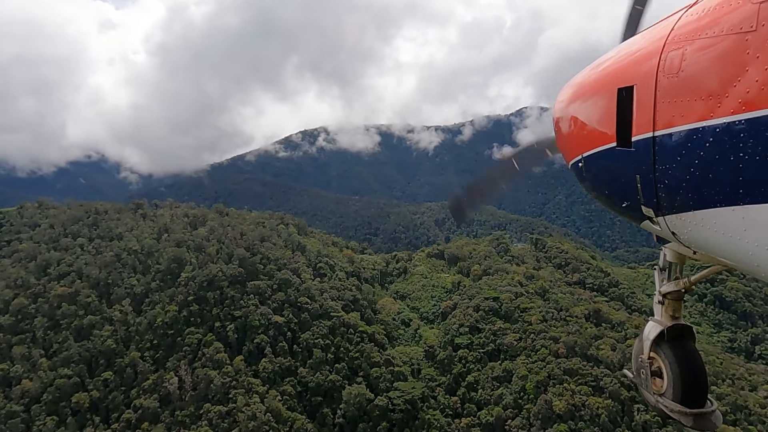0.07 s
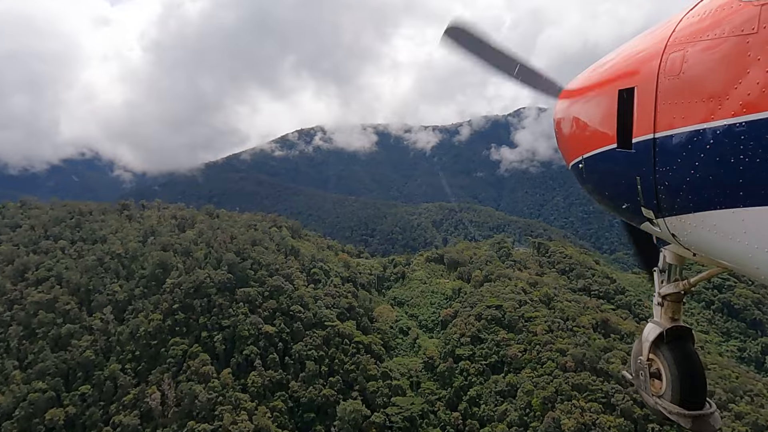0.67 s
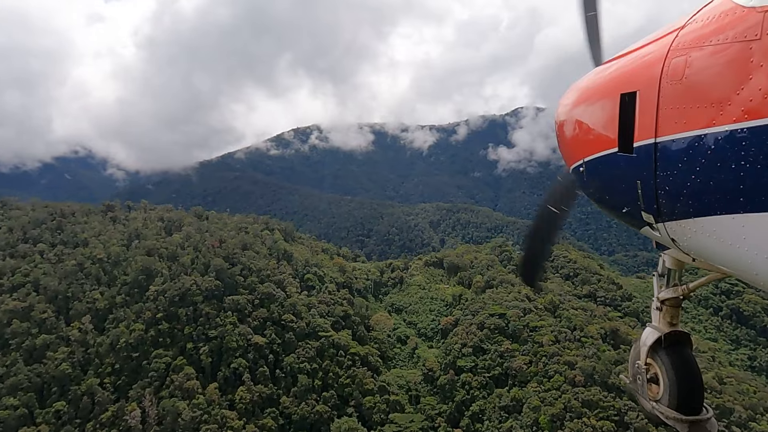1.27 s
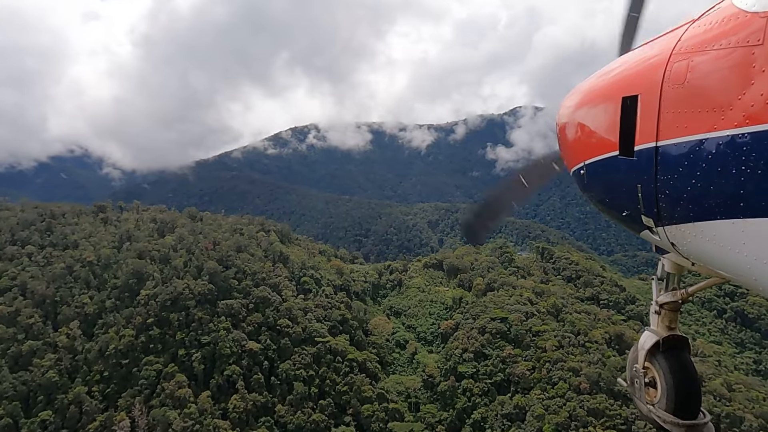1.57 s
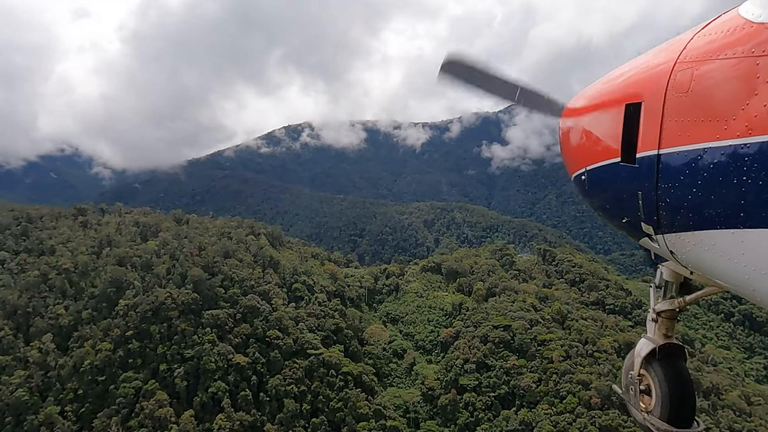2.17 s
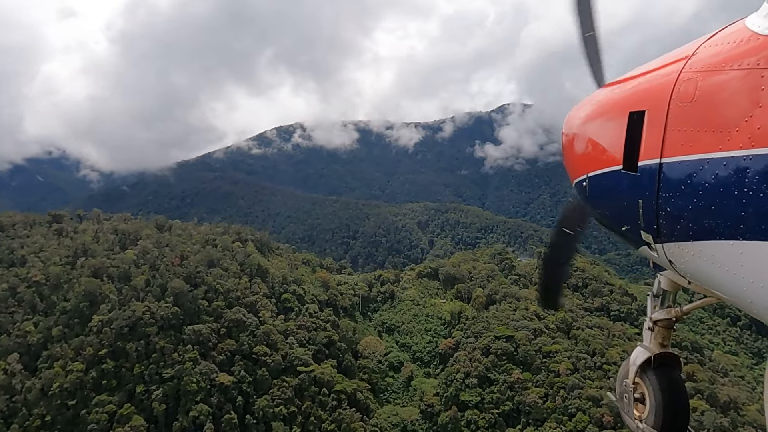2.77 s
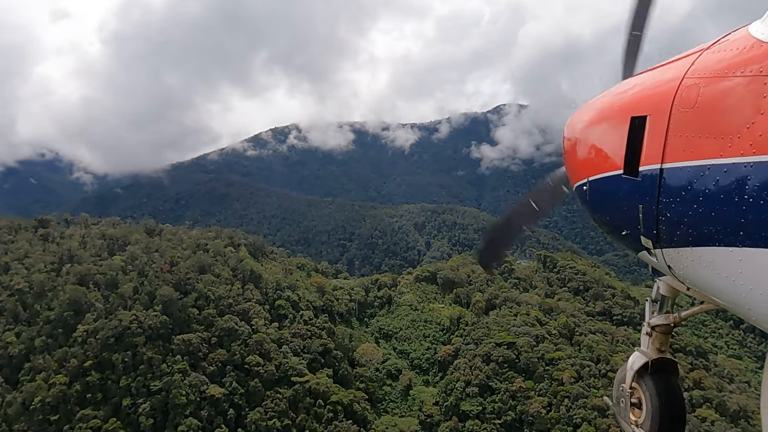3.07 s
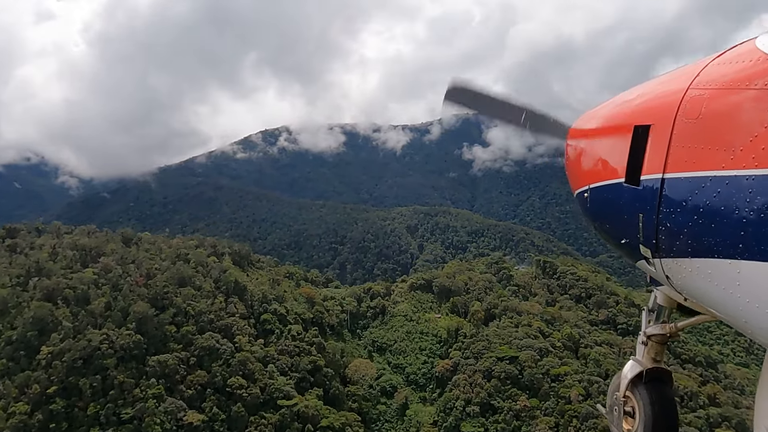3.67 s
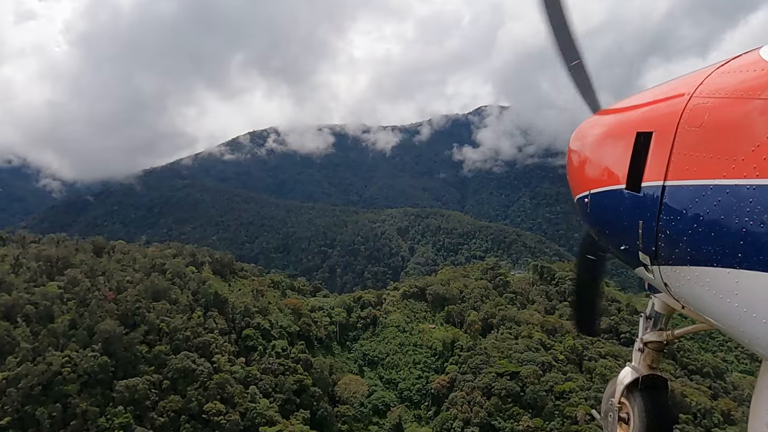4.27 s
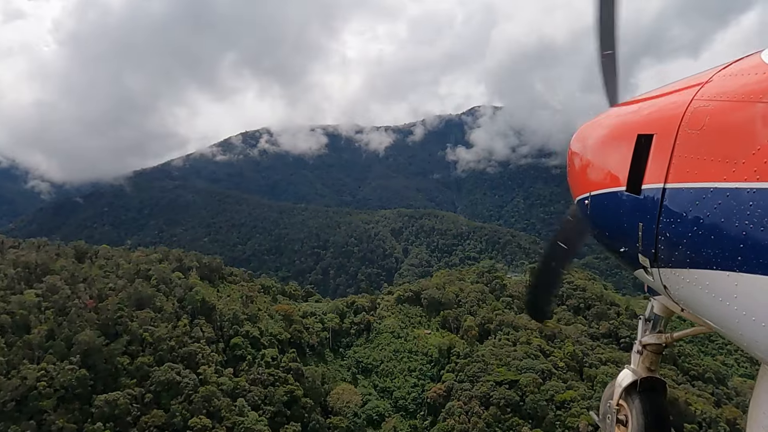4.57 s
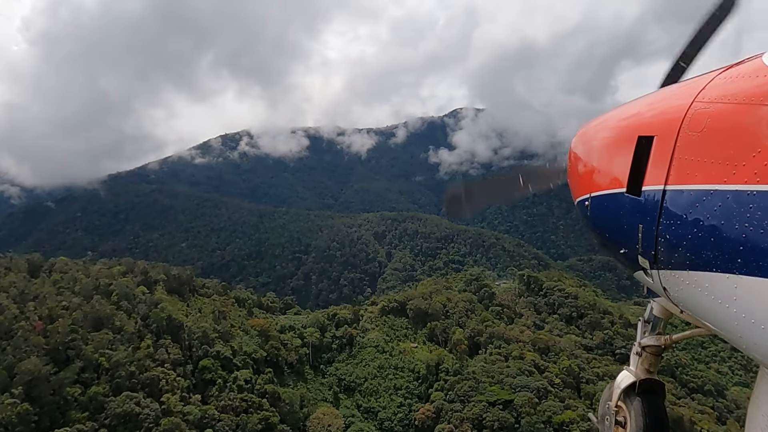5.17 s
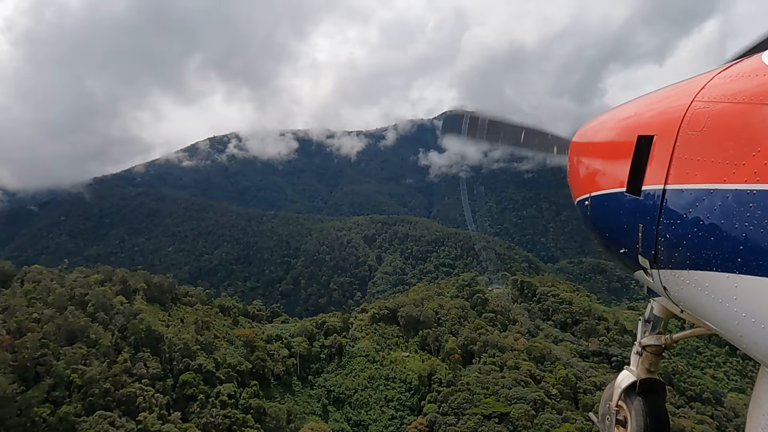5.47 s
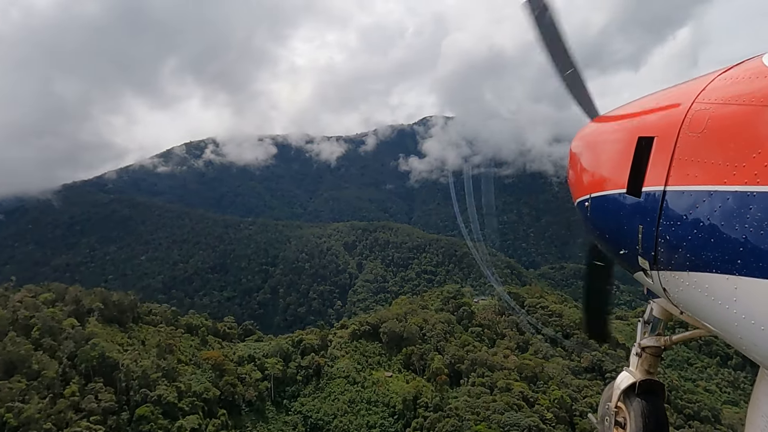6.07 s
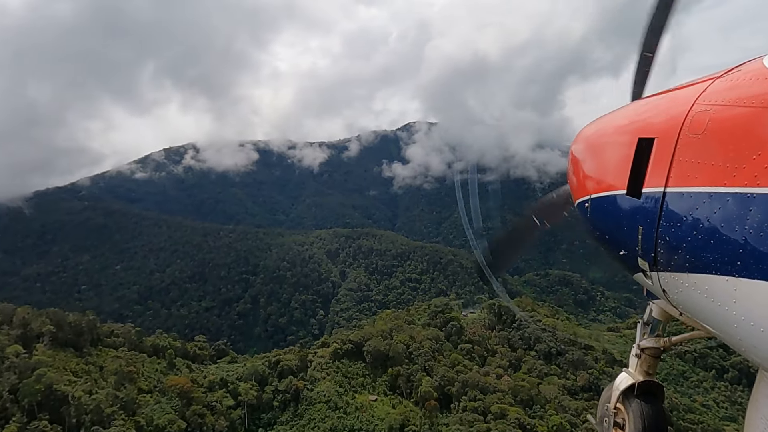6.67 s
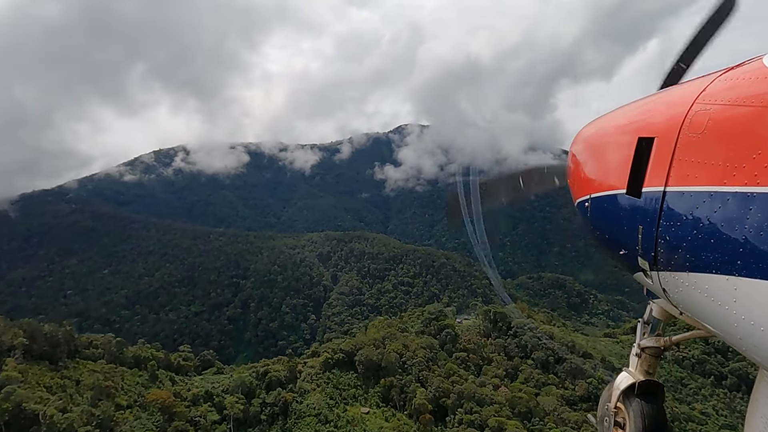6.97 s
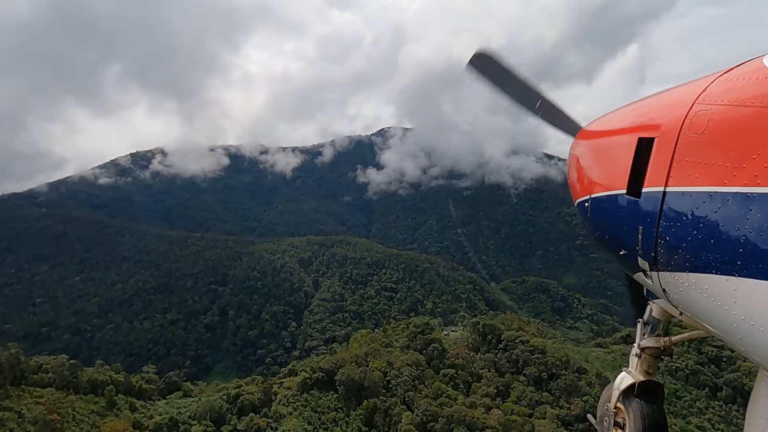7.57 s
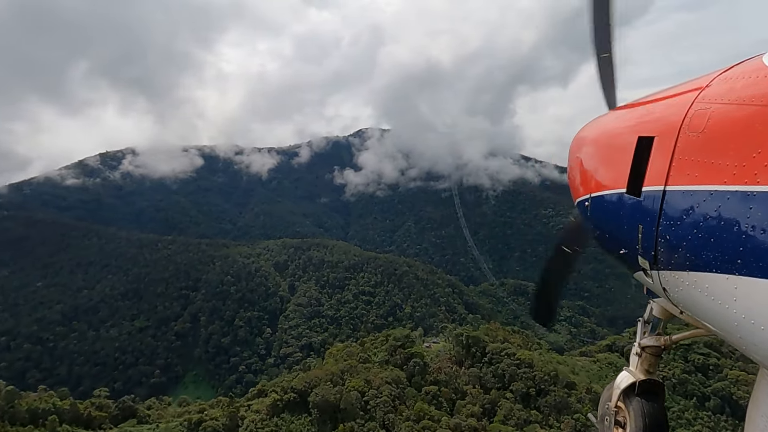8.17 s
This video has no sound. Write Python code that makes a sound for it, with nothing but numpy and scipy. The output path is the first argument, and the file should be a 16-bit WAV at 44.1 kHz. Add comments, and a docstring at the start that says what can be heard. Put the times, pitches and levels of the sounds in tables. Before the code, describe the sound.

Deep buffeting wind and a fluttering, slightly hollow rush of air surround a microphone mounted on a small plane in flight. Through it runs the low drone of the propeller, steady in pitch and wavering slightly in strength. A few light drizzle ticks land at scattered moments, and a thin turbine whine steps up in level midway while staying faint.

```python
"""A single-engine plane's three-blade propeller hums at governed speed, heard from a camera on the airframe.
Buffeting air roars heavily; the slipstream rings hollows of the airframe and hisses in quick eddies.
A faint turbine whine sits on top and steps up once. Drizzle ticks now and then on the camera,
whose limiter holds the level flat."""
import sys
import numpy as np
from scipy import signal
from scipy.fft import rfft, irfft, next_fast_len
from scipy.io import wavfile
from scipy.ndimage import uniform_filter1d, minimum_filter1d, map_coordinates

SR = 44100
rng = np.random.default_rng(int(sys.argv[2]) if len(sys.argv) > 2 else 0)


def waveform_to_disk(signal):
    """Save audio, clipped to [-1, 1], as 16-bit WAV at the path in sys.argv[1]."""
    frames = np.transpose(np.atleast_2d(signal))
    scaled = np.clip(frames, -1, 1) * 32767
    samples = np.round(scaled).astype(np.int16)
    wavfile.write(sys.argv[1], SR, samples)


N = 370881


def propeller(t, angle, throb_db, waver_db, smear_rad):
    """Each blade pushes a pressure pulse; turbulence makes the hum throb and shakes its overtones."""
    # harmonic, level_db
    tones = [(1, -20.9), (2, -26.3), (3, -37), (4, -31), (5, -41), (6, -40.5), (7, -38.5), (10, -39),
             (11, -43.5)]
    # harmonic, centre_s, gain_db, half_width_s
    swells = [(1, 1.8, -3.5, .2), (1, 4.5, 2.5, .25), (1, 6.05, -6, .55), (1, 7.6, 3.5, .4),
              (2, 1.5, 3.5, .25), (2, 4.3, -3, 1.6), (2, 6.45, -5, .35), (2, 7.25, 2.5, .3),
              (4, 4.3, -6, .2), (4, 6.9, -3.5, .3), (7, 3, 2.5, .9), (7, 6.5, -10, .8)]
    hum = np.zeros(N)
    for harmonic, level_db in tones:
        swell_db = bells(t, [row[1:] for row in swells if row[0] == harmonic])
        shake_db = throb_db * wobble(9) if harmonic == 1 else waver_db * wobble(3)
        phase = harmonic * angle + rng.uniform(0, 2 * np.pi) + smear_rad * wobble(6.6)
        hum += amp(level_db + swell_db + shake_db) * np.cos(phase)
    return np.sqrt(2) * hum


def blade_angle(blade_hz, drift_hz):
    """Blade-passage phase; the governor holds the speed almost constant."""
    return 2 * np.pi * np.cumsum(blade_hz + drift_hz * wobble(1.547)) / SR


def buffet(lump_db):
    """Large eddies thump on the camera."""
    # freq_hz, density_db
    spectrum = [(8, -63), (20, -44.5), (32, -39.5), (55, -35.5), (110, -36.5), (220, -41), (420, -47),
                (700, -55), (1200, -62.5), (2500, -110)]
    return amp(lump_db * wobble(16)) * air(rng.standard_normal((2, N)), lambda hz: amp(along(spectrum, hz)))


def slipstream(eddies, eddy_db, flutter_db):
    """Propeller wash roars past and rings airframe hollows, each swelling on its own."""
    # freq_hz, density_db
    rush = [(150, -78), (400, -54), (650, -50.5), (850, -53), (930, -49.5), (1060, -48.5), (1250, -54),
            (1450, -61), (1850, -62), (2200, -72), (3000, -87), (6000, -120)]
    # centre_hz, width_hz, peak_density_db, swell_db
    hollows = [(947, 68, -51.5, .5), (3070, 150, -73.5, 1), (3150, 480, -76, .5), (4500, 130, -81, 1),
               (4790, 150, -78.5, 1), (4990, 110, -77, 1.2)]
    roar = air(rng.standard_normal((2, N)), lambda hz: amp(along(rush, hz)))
    for centre_hz, width_hz, peak_db, swell_db in hollows:
        white = rng.standard_normal((2, N))
        ring = air(white, lambda hz: amp(peak_db) / (1 + 2 * ((hz - centre_hz) / width_hz) ** 2))
        roar += amp(swell_db * wobble(5.4)) * ring
    return amp(eddy_db * eddies + flutter_db * wobble(90)) * roar


def hiss(eddies, angle):
    """High airflow hiss, flickering unevenly across pitch and time, louder in each eddy and blade wake."""
    # freq_hz, density_db
    spectrum = [(1000, -100), (2300, -73), (3500, -75.5), (4000, -75.5), (4300, -76), (4800, -73.5),
                (5500, -78), (6400, -82), (7200, -79.5), (8000, -89.5), (9100, -94), (9900, -91.5),
                (10400, -102), (12100, -102)]
    gain_db = .45 * eddies + .2 * wobble(6) + .65 * wobble(110) + .42 * np.cos(angle)
    return amp(gain_db) * air(flicker_noise(depth_db=1.3), lambda hz: amp(along(spectrum, hz)))


def turbine(t, angle, base_db, rise_db, rise_mid_s, rise_s, swing_rad):
    """The whine steps up once; blade wakes split it into lines one blade rate apart."""
    # pitch_hz, relative_db
    tones = [(9815, 1.5), (14185, -24.5)]
    whine_db = base_db + rise_db * np.clip(.5 + (t - rise_mid_s) / rise_s, 0, 1)
    whine = np.zeros(N)
    for pitch_hz, relative_db in tones:
        gain = amp(whine_db + relative_db + wobble(8))
        phase = 2 * np.pi * pitch_hz * t + swing_rad * np.sin(angle) + .4 * wobble(6)
        whine += gain * np.sin(phase)
    return np.sqrt(2) * whine


def drizzle(spray_db, spread_db, spray_count):
    """A few drops and a fine spray tick on the housing, each ringing it a little differently."""
    # start_s, level_db
    drops = [(1.005, -15), (3.212, -19), (3.856, -18), (3.914, -16.5), (4.414, -18), (5.113, -19),
             (5.397, -18), (6.809, -20), (8.116, -11.5)]
    # pitch_hz, mode_db, t60_s
    housing_modes = [(1670, 5, 0.0076), (2330, 2.5, 0.0055), (2950, -0.5, 0.0055)]
    chance = rng.random((spray_count, 2))
    spray = np.column_stack([chance[:, 0] * N / SR, spray_db + spread_db * chance[:, 1]])
    t = np.arange(SR // 50) / SR
    onset = 1 - np.exp(-(t / .0005) ** 2)  # water strikes softly: about 1 ms to build
    ticks = np.zeros(N + SR)
    for start_s, level_db in np.vstack([drops, spray]):
        ring = np.zeros(len(t))
        for pitch_hz, mode_db, t60_s in housing_modes:
            detuned_hz = pitch_hz * rng.lognormal(0, 0.045)
            ring += amp(mode_db - 60 * t / t60_s) * np.sin(2 * np.pi * detuned_hz * t)
        ticks[round(start_s * SR):][:len(t)] += amp(level_db) * onset * ring
    return ticks[:N]


def air(white, colour):
    """Two noises shaped by colour(hz), heard at both microphone ports; small eddies differ between them."""
    # freq_hz, port_coherence
    coherence = [(60, 0.994), (130, 0.99), (260, 0.89), (500, 0.8), (1100, 0.9), (1450, 0.78), (1900, 0.79),
                 (2600, 0.6), (3200, 0.63), (4300, 0.84), (6000, 0.32), (7800, 0.64), (9000, 0.99)]

    def response(hz):
        turn_rad = np.arccos(np.clip(along(coherence, hz), 0, 1)) / 2
        return colour(hz) * np.array([np.cos(turn_rad), np.sin(turn_rad)])

    mid, side = filtered(white * np.sqrt(SR / 2), response)
    return np.array([mid + side, mid - side])


def flicker_noise(depth_db, frame_samples=512):
    """Two white noises, their gain uneven in time and frequency."""
    spectra = signal.stft(rng.standard_normal((2, N)), nperseg=frame_samples)[2]
    field = uniform_filter1d(rng.standard_normal(spectra.shape[1:]), size=16, axis=0)
    field = unit(uniform_filter1d(field, size=5, axis=1))
    noise = signal.istft(spectra * amp(depth_db * field), nperseg=frame_samples)[1]
    return unit(noise[:, :N])


def amp(db):
    """Decibels to gain."""
    return 10 ** (np.asarray(db) / 20)


def unit(x):
    """Scale to rms 1."""
    return x / np.sqrt(np.mean(x ** 2) + 1e-20)


def along(points, hz):
    """Interpolate (freq_hz, value) points on a log axis."""
    freq_hz, values = np.transpose(points)
    return np.interp(np.log(hz + 1), np.log(freq_hz + 1), values)


def wobble(rate_hz):
    """Smooth random curve, rms 1."""
    knots = rng.standard_normal(int(N * rate_hz / SR) + 4)
    return unit(map_coordinates(knots, [np.arange(N) * rate_hz / SR]))


def bells(t, rows):
    """Bell-shaped swells and sags about 0 dB."""
    return sum(db * np.exp(-((t - centre_s) / half_width_s) ** 2) for centre_s, db, half_width_s in rows)


def filtered(x, response):
    """Apply a complex response(hz)."""
    size = next_fast_len(N + SR // 2)
    return irfft(rfft(x, size) * response(np.fft.rfftfreq(size, 1 / SR)), size)[..., :N]


def limiter(x, drive_db, ceiling_db):
    """Gain ducks as short-term power nears the ceiling, and on rare peaks."""
    hot = x * amp(drive_db)
    power = np.abs(uniform_filter1d(np.mean(hot ** 2, axis=0), size=700))
    power_gain = (1 + (power / amp(ceiling_db) ** 2) ** 4) ** (-1 / 8)
    peak_gain = minimum_filter1d(.88 / (np.abs(hot).max(axis=0) + 1e-9), size=300)
    return hot * uniform_filter1d(np.minimum(power_gain, peak_gain), size=300)


def scene():
    """Engine, airflow and drizzle; the same eddies stir roar and hiss."""
    # centre_s, gain_db, half_width_s
    gusts = [(0.45, -0.7, 0.33), (4.15, 0.5, 0.28), (6.72, 0.5, 0.18)]
    t = np.arange(N) / SR
    angle = blade_angle(blade_hz=93.84, drift_hz=0.048)
    eddies = wobble(32)
    hum = propeller(t, angle, throb_db=1.1, waver_db=1.15, smear_rad=.2)
    whine = turbine(t, angle, base_db=-82, rise_db=14, rise_mid_s=4.5, rise_s=.8, swing_rad=1.7)
    wash = slipstream(eddies, eddy_db=0.45, flutter_db=1.23) + hiss(eddies, angle)
    airflow = buffet(lump_db=1.1) + amp(bells(t, gusts)) * wash
    return hum + airflow + whine + drizzle(spray_db=-44, spread_db=2, spray_count=70)


def record(dry):
    """The camera body shades and delays each port; then limiter and treble roll-off."""
    # freq_hz, left_minus_right_db
    balance = [(100, 0), (300, -0.5), (700, -1.5), (1100, -2.5), (2100, -2.4), (3000, -8), (4000, -1),
               (4800, 3), (6000, 2.5), (7500, -0.5)]
    # freq_hz, left_lead_rad
    lead = [(450, -0.032), (1000, -0.56), (1800, -0.19), (2600, 0.88), (3000, 0.19), (3700, -0.75),
            (5500, -0.48), (7000, -0.16)]
    rolloff_hz, cutoff_hz = 12000, 14450
    sides = np.array([[1], [-1]]) / 2
    ports = filtered(dry, lambda hz: amp(sides * along(balance, hz)) * np.exp(1j * sides * along(lead, hz)))
    held = limiter(ports, drive_db=1.0, ceiling_db=-11)
    return filtered(held, lambda hz: (hz < cutoff_hz) / np.hypot(1, (hz / rolloff_hz) ** 9))


dry = scene()
out = record(dry)
waveform_to_disk(out)
```